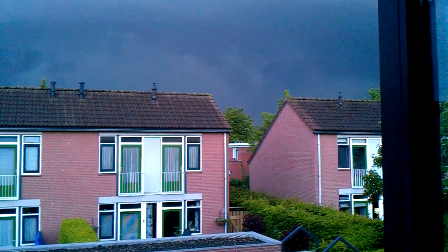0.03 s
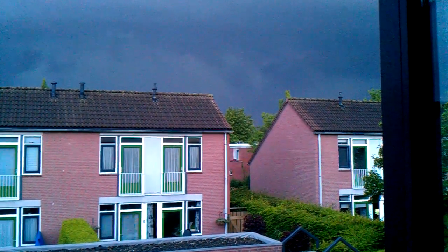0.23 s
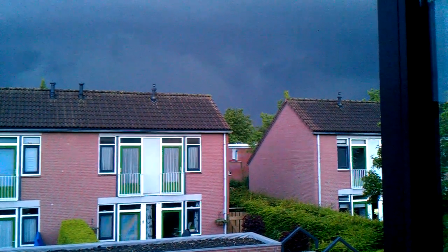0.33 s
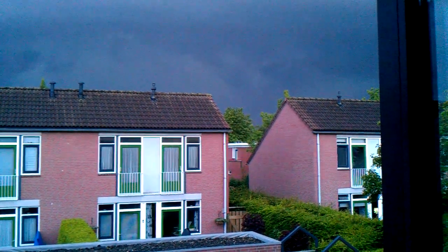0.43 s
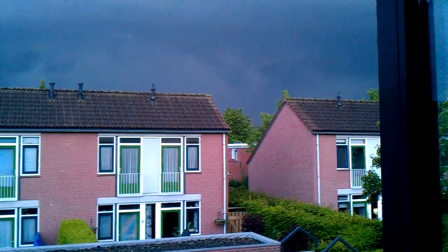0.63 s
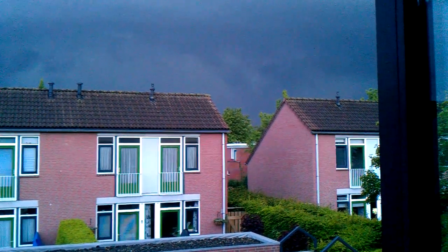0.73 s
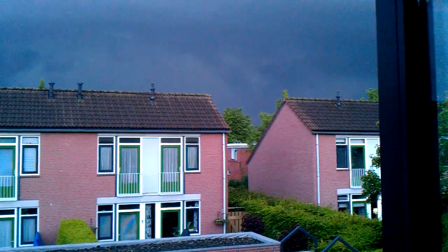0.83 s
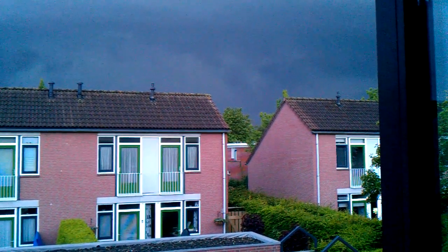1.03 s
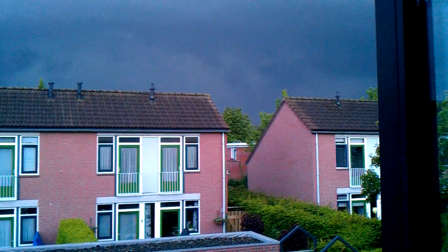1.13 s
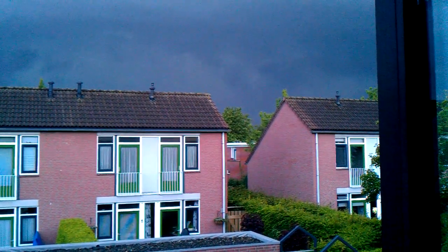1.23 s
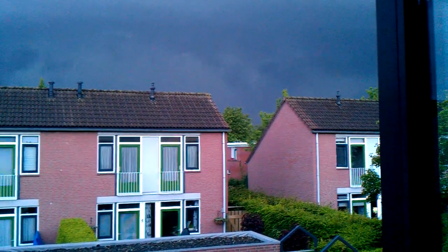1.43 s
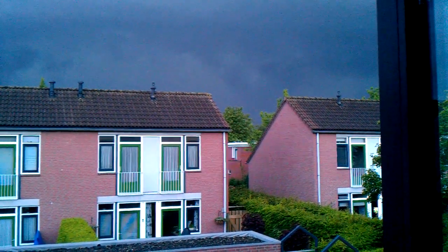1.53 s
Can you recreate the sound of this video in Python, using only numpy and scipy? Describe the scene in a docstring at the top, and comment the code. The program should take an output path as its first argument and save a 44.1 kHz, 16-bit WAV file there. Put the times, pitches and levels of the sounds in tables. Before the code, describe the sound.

Close to the microphone, metal wind chimes strike several times with sharp ticks and slowly fade before a few lighter strikes. Soft wind rushes between the houses and rustles hedges, with a distant knock and faint whistling notes.

```python
"""Outside a window among houses, small metal wind chimes ring as a storm comes up.
One rod is struck hard and touched again several times while two neighbours ring faintly;
each rings in its bending modes, and the metal ticks on contact. Further off come one knock
and a few faint whistling notes. Wind rumbles and rustles in the hedges."""
import sys
import numpy as np
from scipy import signal
from scipy.fft import rfft, irfft
from scipy.io import wavfile

SR = 44100
rng = np.random.default_rng(int(sys.argv[2]) if len(sys.argv) > 2 else 0)


def wrap_up_sound(samples):
    """Save the sound to the file named by the first command line argument, as 16-bit audio."""
    columns = np.atleast_2d(samples).T
    # keep every value between -1 and 1, then stretch to whole-number steps
    tamed = np.clip(columns, -1, 1)
    steps = np.round(tamed * 32767).astype(np.int16)
    wavfile.write(sys.argv[1], SR, steps)


N = 70560
TIME = np.arange(N) / SR

# loud rod, bending modes: f/Hz, t60/s
LOUD_MODES = [(2030, 7.3), (3903, 2), (3942, 14), (6446.3, 2.66), (9322, 0.85), (9524, 1.455), (12780, .3),
              (13147, 0.54)]
# its strikes: t/s, level/dB per mode
LOUD_HITS = [(0.2354, -62.5, -66, -53, -27.5, -43.5, -20, -59, -35),
             (.3046, -65, -65, -57, -37.5, -52, -25.5, -74, -38),
             (0.3672, -59, -64, -59.5, -31, -48, -28, -83, -48.5),
             (0.4663, -76, -72, -63, -37, -57, -28.5, -83, -49.5),
             (1.474, -69, -69, -63.5, -42, -63, -39.5, -90, -62),
             (1.5616, -61, -65, -62, -39, -65, -37.5, -85, -62)]
# slightly longer rod, upper modes split into beating pairs: f/Hz, t60/s
BEATING_MODES = [(3881, 15), (3960, 0.49), (6326, 1.23), (6357.5, 1.77), (9285, 0.54), (9399, 4.2)]
# its strikes: t/s, level/dB per mode
BEATING_HITS = [(.055, -77, -85, -53.5, -56, -61, -65), (.247, -71, -57, -61, -47.5, -52, -57),
                (1.153, -76, -78, -66, -51, -66, -78), (1.232, -73, -76, -51, -48.5, -46, -58)]
# third rod, modes: f/Hz, t60/s
THIRD_MODES = [(5111, 2), (5189.3, 2.9), (7983, 3.6), (8283, .7), (8473.4, 2.1), (12091, 0.4),
               (12500, 0.36)]
# its strikes: t/s, level/dB per mode
THIRD_HITS = [(0, -77, -58, -78, -91, -47, -100, -100), (.2365, -76, -60.5, -71, -60, -53, -92, -90),
              (.3046, -79, -58.5, -85, -76, -58.5, -98, -86), (0.433, -66, -56.5, -75, -55, -63, -66, -65),
              (0.476, -69, -59.5, -76, -65, -53, -78, -76)]

def chimes():
    """Three struck metal rods of different pitch."""
    return rod(LOUD_MODES, LOUD_HITS) + rod(BEATING_MODES, BEATING_HITS) + rod(THIRD_MODES, THIRD_HITS)


def rod(modes, strikes, contact_s=0.0011, kick_rad=0.87, sway_db=0.77, sway_hz=5.5):
    """Each touch jolts every mode to a new level and phase to ring down from; swinging wavers it."""
    out = np.zeros(N)
    starts, *levels = np.transpose(strikes)
    touched = [np.sin(np.pi / 2 * np.clip((TIME - t) / contact_s, 0, 1)) ** 2 for t in starts] + [0]
    for (hz, t60), mode_db in zip(modes, levels):
        phases = rng.uniform(0, 2 * np.pi) + kick_rad * np.cumsum(rng.choice([-1, 1], len(starts)))
        sway = from_db(sway_db * drift(sway_hz))
        for k, t in enumerate(starts):
            until_next = touched[k] - touched[k + 1]
            envelope = from_db(mode_db[k]) * decay(t, t60) * until_next
            out += sway * envelope * np.sin(2 * np.pi * hz * TIME + phases[k])
    return out


# metal contacts: t/s, tick level/dB, crack level/dB
CONTACTS = [(0.2362, -40.5, -34.5), (0.306, -53.5, -42), (0.3704, -45.5, -49), (0.397, -49, -46),
            (.465, -47.5, -50), (1.2337, -55, -70), (1.4748, -52, -51), (1.5608, -52, -54)]
# tick spectrum: f/Hz, level/dB
TICK_SPECTRUM = [(2000, -14), (3300, -48), (4000, 10), (4700, -19.5), (6500, 0), (7700, -0.5), (9500, 9.5),
                 (11000, -36), (15000, -27)]
# crack spectrum: f/Hz, level/dB
CRACK_SPECTRUM = [(3300, -32), (4000, 0), (4700, 1), (5600, -11), (7000, 4.5), (9800, 2.5), (11000, -25),
                  (14000, -19), (15700, -17)]

def ticks(tick_t60_s=0.014, crack_t60_s=0.009, echo_db=-8.5, echo_t60_s=0.2):
    """Metal on metal: a hard crack, and a bright tick that the walls scatter back."""
    tick = sum(from_db(db) * (decay(t, tick_t60_s) + from_db(echo_db) * decay(t, echo_t60_s))
               for t, db, _ in CONTACTS)
    crack = sum(from_db(db) * decay(t, crack_t60_s) for t, _, db in CONTACTS)
    return tick * noise(TICK_SPECTRUM) + crack * noise(CRACK_SPECTRUM)


# thud spectrum: f/Hz, level/dB
THUD_SPECTRUM = [(130, 4), (350, 7), (650, -27), (900, -23), (1450, -3), (2250, -9), (2600, -14),
                 (5000, -36)]
# modes of the knocked object: f/Hz, level/dB, t60/s
KNOCK_RING = [(800, -54.5, 0.22), (1055, -54, 0.095), (1470, -41.5, 0.034), (1873, -47.5, 0.098),
              (2023, -39, 0.041), (2281, -49.5, 0.13)]

def knock(start_s=0.372, attack_s=0.0028, thud_db=-44, echo_db=-7):
    """A distant woody knock: a dull thud and a ring that echoes between the houses."""
    thud = from_db(thud_db) * decay(start_s, t60_s=0.099) * noise(THUD_SPECTRUM)
    ring = np.zeros(N)
    for hz, db, t60 in KNOCK_RING:
        phase = 2 * np.pi * hz * TIME + rng.uniform(0, 2 * np.pi)
        ring += from_db(db) * decay(start_s, t60) * np.sin(phase)
    ring *= np.clip((TIME - start_s) / attack_s, 0, 1)
    walls = rng.standard_normal(N) * decay(start_s=0.035, t60_s=0.21)
    echo = signal.fftconvolve(ring, walls / np.linalg.norm(walls))[:N]
    return thud + ring + from_db(echo_db) * echo


# whistling notes: peak t/s, length/s, f/Hz, level/dB
WHISTLE_NOTES = [(0.539, 0.052, 2670, -60.5), (0.763, 0.063, 779, -60.5), (0.99, 0.22, 1538, -59),
                 (.995, 0.096, 946, -58.5), (1.2, 0.092, 2224, -63)]

def whistles(blur_hz=32.5):
    """Brief distant notes, blurred in pitch, swell and fade in the wind."""
    out = np.zeros(N)
    for t, length, hz, db in WHISTLE_NOTES:
        phase = 2 * np.pi * np.cumsum(hz + blur_hz * drift(rate_hz=62)) / SR
        out += from_db(db) * swell(t, length) * np.sin(phase)
    return out


# rush spectrum: f/Hz, level/dB
RUSH_SPECTRUM = [(30, -19), (45, -9), (60, -6.5), (85, 0), (120, 0), (155, -2), (210, -0.5), (310, -4.5),
                 (480, -7.5), (750, -10), (1050, -10.5), (1350, -14.5), (2100, -12.5), (2600, -23.5),
                 (3700, -26.5), (5000, -35.5)]
# rush envelope: t/s, level/dB
RUSH_LEVEL = [(0, -53), (.15, -52), (.36, -51.5), (.52, -50.5), (.68, -52), (1.0, -51), (1.3, -51.5),
              (1.45, -52), (1.6, -53)]
# deep puffs: peak t/s, length/s, centre f/Hz, level/dB
WIND_PUFFS = [(0.045, 0.083, 185, -49), (.51, 0.19, 134, -53), (1.25, 0.086, 84.5, -52),
              (1.554, 0.19, 67, -61)]

def wind(top_hz=5130, skirt_db=-13.5, floor_db=-60):
    """Air rushes low over the roofs, with a few deep puffs."""
    lowpass = signal.butter(4, top_hz, fs=SR, output="sos")
    rush = contour(RUSH_LEVEL) * signal.sosfilt(lowpass, noise(RUSH_SPECTRUM, flicker_db=1.58))
    puffs = np.zeros(N)
    for t, length, hz, db in WIND_PUFFS:
        spectrum = [(hz / 2, skirt_db), (hz, 0), (hz * 2, skirt_db), (hz * 10, floor_db)]
        puffs += from_db(db) * swell(t, length) * noise(spectrum)
    return rush + puffs


# rustle spectrum: f/Hz, level/dB
RUSTLE_SPECTRUM = [(3000, 2), (4500, -6.5), (5600, -6.5), (7000, -4), (8400, 3.5), (9800, -9), (11200, -29),
                   (15500, -26)]
# rustle envelope: t/s, level/dB
RUSTLE_LEVEL = [(0, -66), (.45, -65.5), (.7, -64), (1.0, -61), (1.25, -63.5), (1.6, -67)]

def leaves():
    """Hedge leaves rustle in the wind."""
    return contour(RUSTLE_LEVEL) * noise(RUSTLE_SPECTRUM, flicker_db=1.96)


def hiss(level_db=-67.5):
    """Steady white hiss under everything."""
    return from_db(level_db) * rng.standard_normal(N)


def noise(spectrum, flicker_db=0):
    """Coloured noise, rms 1; half-octave bands flicker independently by flicker_db."""
    hz = np.maximum(np.fft.rfftfreq(N, 1 / SR), 1)
    points_hz, db = np.transpose(spectrum)
    low_rolloff = np.minimum(hz / points_hz[0], 1) ** 2
    gain = from_db(np.interp(np.log(hz), np.log(points_hz), db))
    bins = rfft(rng.standard_normal(N)) * low_rolloff * gain
    if not flicker_db:
        return unit_rms(irfft(bins, N))
    band = np.floor(2 * np.log2(hz))
    bands = (irfft(bins * (band == k), N) for k in range(8, 29))
    return unit_rms(sum(x * from_db(flicker_db * drift(rate_hz=8)) for x in bands))


def drift(rate_hz):
    """Smooth random motion of spread 1."""
    hop, settle = 40, 2000
    pole = np.exp(-2 * np.pi * rate_hz * hop / SR)
    white = rng.standard_normal(N // hop + settle + 2)
    slow = signal.lfilter([1], [1, -2 * pole, pole * pole], white)[settle:]
    return np.interp(np.arange(N) / hop, np.arange(len(slow)), unit_rms(slow))


def decay(start_s, t60_s):
    """Step to 1, then exponential fall."""
    return (TIME >= start_s) * np.exp(-np.log(1000) * np.maximum(TIME - start_s, 0) / t60_s)


def swell(peak_s, length_s):
    """Half-cosine rise and fall."""
    return np.cos(np.pi * np.clip((TIME - peak_s) / length_s, -.5, .5))


def contour(rows):
    """Gain through rows of t/s, level/dB."""
    return from_db(np.interp(TIME, *np.transpose(rows)))


def from_db(db):
    """Decibels to gain."""
    return 10 ** (np.asarray(db) / 20)


def unit_rms(x):
    """Scale to rms 1."""
    return x / np.sqrt(np.mean(x ** 2) + 1e-20)


def scene():
    """Chimes close by, over distant sounds and wind; mono."""
    return (chimes() + ticks() + knock() + whistles() + wind() + leaves() + hiss())[None]


def record(dry):
    """Steep low-pass."""
    cutoff_hz = 15700
    return signal.sosfilt(signal.ellip(14, .1, 80, cutoff_hz, fs=SR, output="sos"), dry)


dry = scene()
out = record(dry)
wrap_up_sound(out)
```